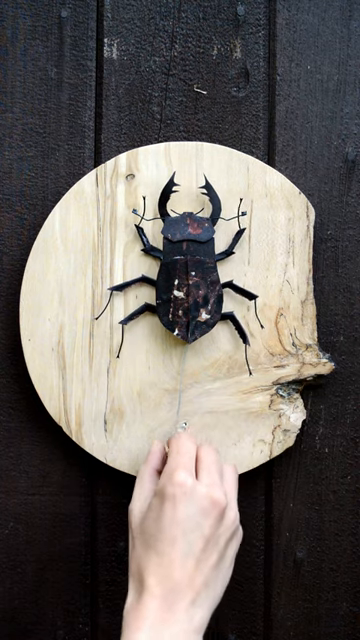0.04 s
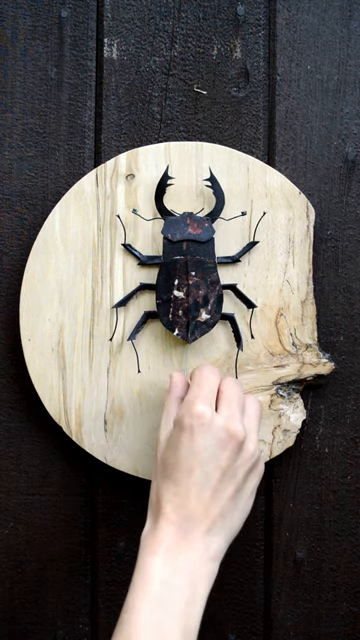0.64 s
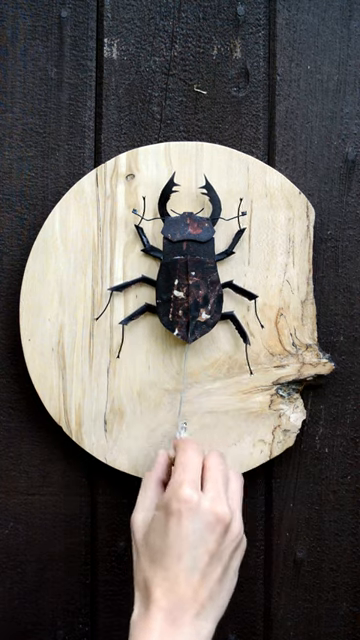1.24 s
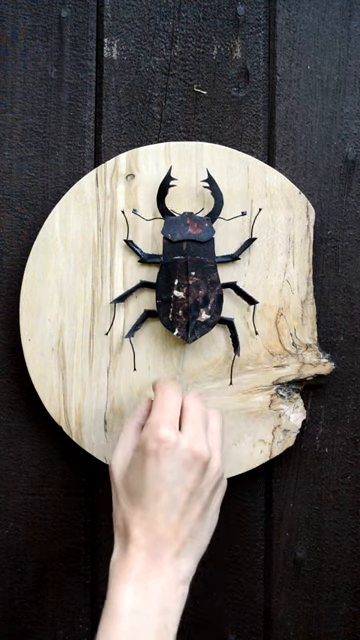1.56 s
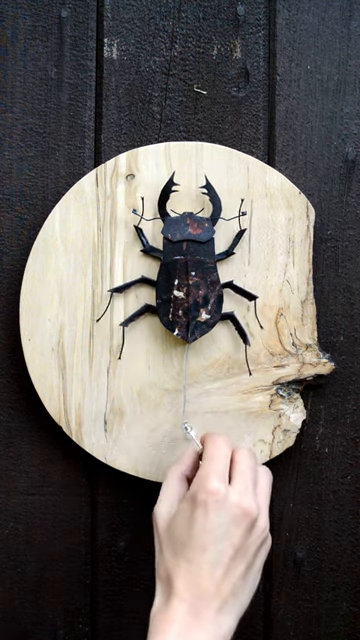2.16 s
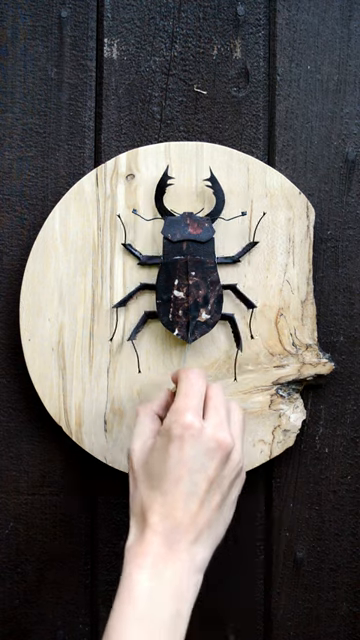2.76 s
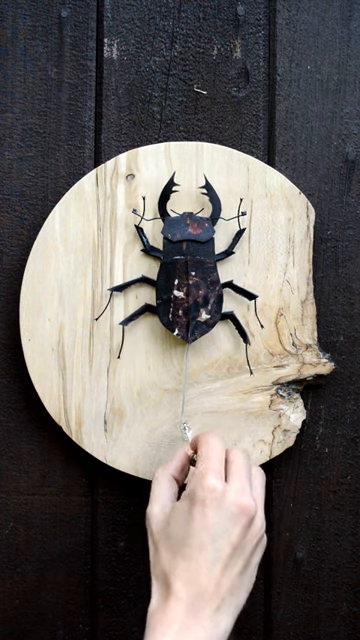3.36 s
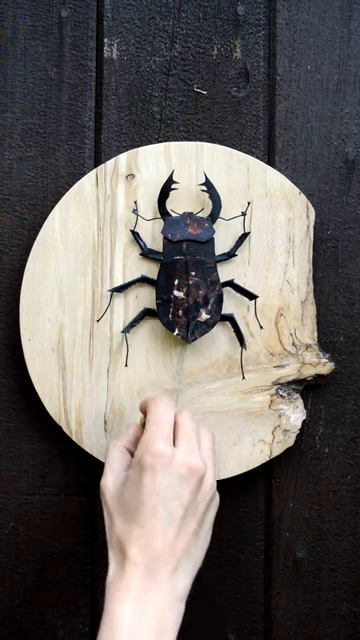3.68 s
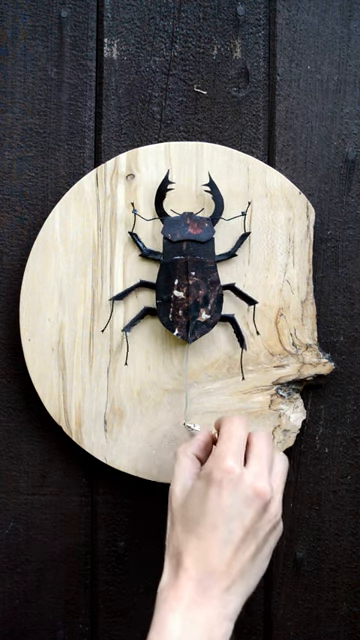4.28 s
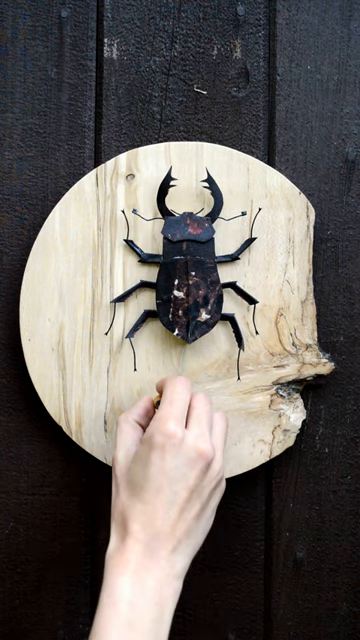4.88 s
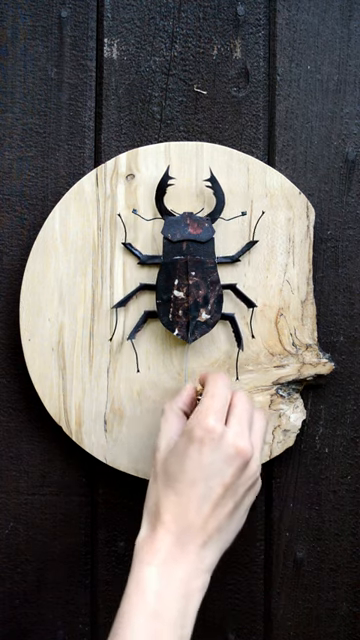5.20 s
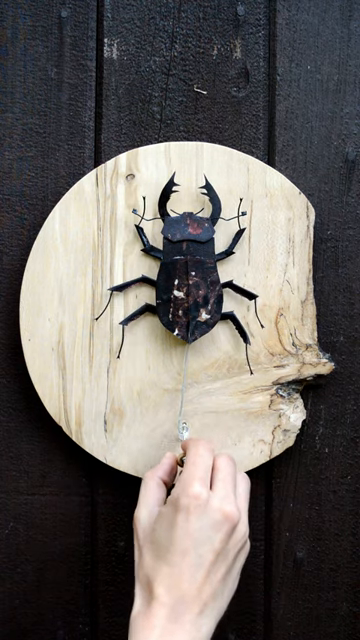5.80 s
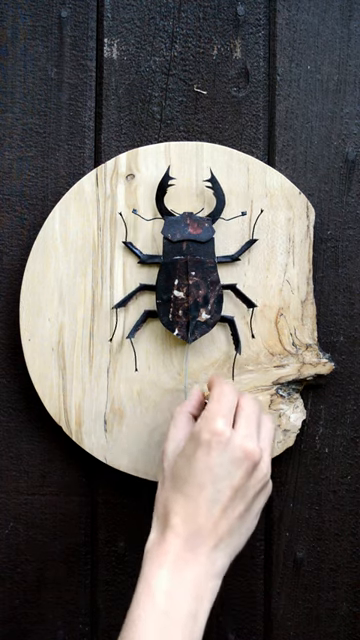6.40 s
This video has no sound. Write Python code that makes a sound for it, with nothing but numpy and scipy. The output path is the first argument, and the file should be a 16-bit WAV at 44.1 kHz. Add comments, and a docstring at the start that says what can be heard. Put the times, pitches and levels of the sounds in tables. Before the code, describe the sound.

Over a soft hiss of still air and the low drone of a distant propeller plane, a little hand-cranked toy clacks steadily right by the microphone. Dry knocks of wire and wood alternate with tiny leg scrapes, ticks and brief squeaks. Faint, high bird whistles come and go. About halfway, one bird warbles closer, then the pivot gives its two loudest squeaks. The plane's drone grows fuller as the toy keeps going.

```python
"""Close to one microphone, a hand cranks a small beetle automaton on a wooden slab, a little under one
turn a second. From the start, over a soft hiss, the wire linkage falls through its slack twice a turn and
clacks, then the legs slide and tick; a pivot squeaks now and then. Far off, small birds call thinly and
a propeller aircraft drones past with sinking pitch, its overtones growing from about two seconds in.
Midway a nearer bird warbles, the two loudest squeaks follow, and the toy clacks on to the end."""
import sys
import numpy as np
from scipy import signal
from scipy.fft import rfft, irfft
from scipy.io import wavfile
from scipy.ndimage import uniform_filter1d

SR = 44100
rng = np.random.default_rng(int(sys.argv[2]) if len(sys.argv) > 2 else 0)


def pcm_store(signal):
    """Save signal as 16-bit PCM."""
    levels = np.round(np.clip(np.atleast_2d(signal), -1, 1) * 32767)
    wavfile.write(sys.argv[1], SR, levels.astype(np.int16).T)


N = 284004

# legs sliding in their guides after a clack: middle_s, half_length_s, level_db
LEG_SLIDES = [(0.378, .028, -51), (0.835, .035, -52), (1.484, .042, -49.5), (1.985, .045, -54.5),
              (2.6, .045, -49.5), (3.06, .06, -56), (3.725, .026, -47), (4.27, .045, -56), (4.8, .022, -49),
              (5.47, .07, -58.5), (6.125, .034, -48)]


def undb(db):
    """Decibels to gain."""
    return 10 ** (np.asarray(db) / 20)


def unit(x):
    """Scale to rms 1."""
    return x / np.sqrt(np.mean(x ** 2))


def curves(rows):
    """Each column after the time column as a value for every sample."""
    times, *columns = np.transpose(rows)
    return [np.interp(np.arange(N) / SR, times, column) for column in columns]


def add(out, start_s, x):
    """Mix x into out from start_s."""
    i = max(int(start_s * SR), 0)
    out[i:i + len(x)] += x[:max(N - i, 0)]


def walk(rate_hz, size=N):
    """Smooth random drift with spread near 1."""
    hold = max(int(SR / rate_hz), 2)
    steps = np.repeat(rng.standard_normal(size // hold + 1), hold)
    return 1.312 * uniform_filter1d(uniform_filter1d(steps, hold), hold)[:size]


def colour(x, spectrum):
    """Filter x along its last axis by a spectrum of (frequency_hz, gain_db) points."""
    hz, db = np.transpose(spectrum)
    f = np.maximum(np.arange(x.shape[-1] // 2 + 1) * SR / x.shape[-1], 1)
    return irfft(rfft(x) * undb(np.interp(np.log(f), np.log(hz), db)), x.shape[-1])


def noise(spectrum):
    """Noise of rms 1 with the given colour."""
    return unit(colour(rng.standard_normal(N), spectrum))


def band(x, low_hz, high_hz, order=4):
    """Band-pass along the last axis."""
    f = np.maximum(np.arange(x.shape[-1] // 2 + 1) * SR / x.shape[-1], 1)
    return irfft(rfft(x) / (1 + (low_hz / f) ** (2 * order)) / (1 + (f / high_hz) ** (2 * order)))


def fade(t, t60):
    """Exponential decay, 60 dB down after t60 seconds."""
    return np.exp(-np.log(1000) * t / t60)


def air(level_db=-50, swell_db=0.14):
    """Still air all around the microphone: a low rumble and a smooth hiss."""
    # colour of the air: frequency_hz, relative_density_db
    air_spectrum = [(20, -11.5), (60, 0), (120, 0.5), (300, -17), (600, -12), (820, -8.5), (1100, -16),
                    (1500, -17), (2250, -21.5), (2400, -15), (2650, -23.5), (5000, -27), (9000, -29.5),
                    (15500, -33)]
    return undb(level_db + swell_db * walk(4.28)) * noise(air_spectrum)


def birds(far_db=-56, near_db=-44, waver=.025, warble_hz=16, echo_db=-3, echo_t60=0.15, distance_db=-2):
    """Distant whistles swell, slide or warble, blurred by many paths and followed by a short echo."""
    # whistles: start_s, length_s, first_hz, last_hz, relative_level_db, warble_share_of_pitch
    whistles = [(0.347, 0.17, 6840, 6350, -60, 0), (1.048, .13, 7050, 6700, -60, 0),
                (2.097, .42, 7240, 6540, -63.5, 0), (3.04, .2, 6100, 3300, -57, 0),
                (3.062, .08, 10900, 9600, -57, 0), (3.34, .15, 6700, 6700, -50, .035),
                (3.335, .15, 7940, 8170, -47.5, .035), (5.05, .16, 7930, 7830, -64, 0.00093)]
    out = np.zeros(N)
    for start_s, length_s, first_hz, last_hz, db, warble in whistles:
        t = np.arange(int(length_s * SR)) / SR
        swell = np.sqrt(np.sin(np.pi * t / length_s))
        direct = np.clip((db - far_db) / (near_db - far_db), 0, .9)  # nearer birds come through cleaner
        scatter = (walk(770) + 1j * walk(700))[:len(t)]
        blur = np.sqrt(2 * direct) + np.sqrt(1 - direct) * scatter
        hz = np.interp(t, [0, length_s], [first_hz, last_hz])
        hz *= 1 + warble * np.cos(2 * np.pi * warble_hz * t)
        hz *= 1 + waver * (1 - direct) * walk(300)[:len(t)]
        whistle = np.real(blur * np.exp(2j * np.pi * np.cumsum(hz) / SR)) / np.sqrt(2)
        add(out, start_s, swell * undb(db) * whistle)
    reflections = rng.standard_normal(SR // 2) * fade(np.arange(SR // 2) / SR, echo_t60)
    echo = signal.fftconvolve(out, reflections / np.linalg.norm(reflections))[:N]
    return undb(distance_db) * (out + undb(echo_db) * echo)


def aircraft(blade_hz=132.7, sink_hz_per_s=2.25, waver=0.002, flutter_db=0.35):
    """Far off, blade harmonics sink and fade in and out along the air path, over a turbulent rumble."""
    # the two strong blade harmonics: time_s, first_db, second_db
    strong_harmonics = [(0.02, -40, -49), (0.37, -39, -49), (0.46, -41, -60), (0.55, -40, -53),
                        (0.71, -41, -57), (0.93, -37, -49), (1.39, -36, -56), (1.94, -30, -44),
                        (2.03, -31, -50), (2.12, -30, -46), (2.7, -37, -36), (3.47, -41, -37),
                        (3.59, -40, -40), (4.32, -36, -32), (4.85, -37, -35), (4.98, -35, -33),
                        (5.88, -36, -39), (6.4, -36, -36)]
    # the third harmonic emerges as the aircraft nears: time_s, level_db
    third_harmonic = [(0, -62), (1.5, -63), (1.8, -55), (1.86, -49), (2.03, -54), (2.27, -46), (2.72, -54),
                      (3.11, -46), (3.86, -46), (4.35, -41), (4.61, -44), (4.66, -51), (6.37, -46),
                      (6.4, -42)]
    # swell of the rumble: time_s, level_db
    rumble_levels = [(0, -46.5), (1.5, -45), (2.7, -40.8), (3.8, -44), (4.4, -40), (4.9, -45), (5.7, -44),
                     (6.4, -41.5)]
    # colour of the rumble: frequency_hz, relative_density_db
    rumble_spectrum = [(30, -21), (60, -9), (100, -3), (150, -2), (200, 3), (280, -12), (345, -5),
                       (420, -9.5), (470, -22), (530, -11), (680, -29.5), (1200, -48)]
    first_db, second_db = curves(strong_harmonics)
    third_db, = curves(third_harmonic)
    rumble_db, = curves(rumble_levels)
    hz = blade_hz - sink_hz_per_s * np.arange(N) / SR
    phase = 2 * np.pi * np.cumsum(hz * (1 + waver * walk(14))) / SR
    blades = np.zeros(N)
    for k, db in enumerate([first_db + 0.2, second_db + 0.2, third_db - 0.2, third_db - 18], 1):
        gain = undb(db + flutter_db * k * walk(16))
        blades += gain * np.sin(k * phase + 2 * np.pi * rng.random())
    rumble = undb(rumble_db + walk(8)) * noise(rumble_spectrum)
    return np.sqrt(2) * blades + rumble


def pivot_squeaks(waver=0.011):
    """Close by, a dry pivot sings for a few hundredths of a second."""
    # squeaks: start_s, length_s, first_hz, last_hz, level_db
    squeaks = [(0.246, 0.0086, 4240, 4300, -52), (0.729, 0.019, 9170, 8800, -42),
               (0.746, .02, 9000, 8950, -56), (2.623, 0.016, 2830, 2800, -50.5),
               (3.581, 0.045, 894, 823.4, -39.5), (3.757, 0.013, 2800, 2780, -51.5),
               (4.096, 0.014, 4280, 4360, -35.5), (4.82, 0.018, 2800, 2770, -57),
               (6.121, 0.025, 2800, 2740, -53), (6.415, 0.013, 4400, 4320, -40)]
    out = np.zeros(N)
    for start_s, length_s, first_hz, last_hz, db in squeaks:
        progress = np.linspace(0, 1, int(length_s * SR))
        hz = np.interp(progress, [0, 1], [first_hz, last_hz]) * (1 + waver * walk(400)[:len(progress)])
        swell = np.sqrt(2 * np.abs(np.sin(np.pi * progress ** 0.92)))
        add(out, start_s, undb(db) * swell * np.sin(2 * np.pi * np.cumsum(hz) / SR))
    return out


def leg_scrapes(slips_per_s=170, spread_db=4, slip_t60=0.061, shaft_db=-62):
    """Stick and slip: tiny scrapes swell as the legs bear on their guides; the shaft always rubs a bit."""
    # the wooden slab under a sliding leg: frequency_hz, relative_density_db
    slab_spectrum = [(600, -28), (820, -10), (970, 0.5), (1070, -10.5), (1170, -1), (1430, -20),
                     (1850, -14.5), (1990, -14), (2120, -23), (4100, -22.5), (5500, -29), (9000, -26),
                     (12000, -46)]
    t = np.arange(N) / SR
    pressure = sum(undb(db) * np.exp(-np.minimum(((t - middle_s) / half_s) ** 2 / 2, 20))
                   for middle_s, half_s, db in LEG_SLIDES)
    slips = rng.random(N) < slips_per_s / SR
    strength = undb(spread_db * np.minimum(rng.exponential(size=N), 2))
    scrapes = unit(signal.fftconvolve(slips * strength, fade(t[:SR // 20], slip_t60))[:N])
    rub = unit(colour(scrapes * rng.standard_normal(N), slab_spectrum))
    return (pressure + undb(shaft_db)) * rub


def contacts(seat_s=.0027, seat_db=-5, strays_per_slide=2, stray_spread_s=.06):
    """Rows of time_s and peak_db in five bands: the wire touches, lands, seats, rebounds; legs tick."""
    # legs catching in their guides: time_s, knock_db, snap_db
    ticks = [(0.305, -59, -59), (0.361, -49.5, -59), (0.381, -47, -52), (0.847, -46.5, -55),
             (1.446, -53, -53), (1.468, -54, -58), (1.512, -51, -55.5), (1.926, -51, -64),
             (2.234, -48.5, -72), (2.52, -54, -65), (2.565, -57, -55), (2.606, -55, -54), (3.051, -53, -60),
             (3.558, -46, -62), (3.666, -59, -53), (3.757, -56, -55), (4.316, -61, -53.5),
             (4.364, -48, -58), (4.405, -52.5, -65), (4.669, -57, -63), (4.804, -46, -60),
             (4.822, -57, -54), (5.49, -63, -57), (5.646, -42, -62), (6.086, -53, -57), (6.114, -47, -63),
             (6.124, -54, -55)]
    # balance of a tick: offset_db per band
    tick_balance = (0, -2, -3, 2, -7)
    # one clack each half turn, a zero lead or rebound meaning none:
    # time_s, touch_lead_s, touch_db, rebound_delay_s, peak_db per band
    clacks = [(0.1395, .032, -39.5, .025, -37, -49, -49, -44, -48),
              (0.7325, .018, -40, 0, -33.5, -39, -37.5, -43.5, -42),
              (1.335, 0, 0, .019, -28, -38, -44.5, -41.5, -42.5),
              (1.8483, .0145, -38, 0, -34.5, -35.5, -38.5, -37, -44),
              (2.432, 0, 0, .029, -35.5, -38.5, -46, -44.5, -40),
              (2.9155, .02, -43, .013, -37, -41, -42.5, -38, -49),
              (3.582, .02, -44, 0, -45, -41, -49, -38, -43),
              (4.101, .012, -42, 0, -29.5, -45, -37, -40, -46),
              (4.582, .018, -44.5, .019, -42, -44.5, -50, -48, -41.5),
              (5.256, .019, -40, 0, -33, -39.5, -43, -43, -48),
              (5.929, 0, 0, .01, -39, -37.5, -49, -43.5, -41),
              (6.421, .0135, -42.5, 0, -35, -39, -39, -41, -49)]
    # balance of the light touch before the wire lands: offset_db per band
    touch_balance = (-.5, -3, -5.5, -8.5, -16)
    # the wire's rebound: peak_db per band
    rebound_peaks = (-46, -56, -56, -48, -53)
    # a stray tick around the middle of a slide: peak_db per band
    stray_peaks = (-60, -63, -60, -62, -67)
    rows = []
    for time_s, knock_db, snap_db in ticks:
        tick_db = [knock_db, knock_db, (knock_db + snap_db) / 2, snap_db, snap_db]
        rows.append((time_s, *np.add(tick_db, tick_balance)))
    for time_s, lead_s, touch_db, rebound_s, *landing_db in clacks:
        rows.append((time_s, *landing_db))
        rows.append((time_s + seat_s, *np.add(landing_db, seat_db)))
        if lead_s:
            rows.append((time_s - lead_s, *np.add(touch_balance, touch_db)))
        if rebound_s:
            rows.append((time_s + rebound_s, *rebound_peaks))
    for middle_s, *_ in LEG_SLIDES:
        for offset_s in stray_spread_s * rng.standard_normal(strays_per_slide):
            rows.append((middle_s + offset_s, *stray_peaks))
    return rows


def toy_ring(t, count, scatter_db=4, crack_db=11, crack_t60=0.011, tail_db=3, tail_t60=0.12):
    """The toy's ring, a row per contact: modes weighted by where it lands, a dry crack, a duller tail."""
    # resonances of the toy: pitch_hz, relative_level_db, t60_s
    resonances = [(865, -3, 0.075), (968, 6.5, 0.039), (1179, 0, 0.037), (1456, -4, 0.019),
                  (1682, -5, 0.024), (1988, -6, 0.051), (2344, 1, 0.037), (3010, -3.5, 0.04),
                  (3370, -10.5, 0.072), (3900, -6, 0.064), (4280, 4.5, 0.022), (4690, 0.5, 0.019),
                  (6670, 2.5, 0.021), (8660, -2, 0.019), (8940, -3, 0.051), (9820, -7.5, 0.034),
                  (10300, -5.5, 0.02), (10870, -3, 0.009), (12050, 1.5, 0.014)]
    hz, db, t60 = np.transpose(resonances)[:, :, None]
    modes = undb(db) * fade(t, t60) * np.sin(2 * np.pi * hz * t)
    strength, polarity = rng.standard_normal((count, len(resonances), 2)).transpose(2, 0, 1)
    weights = np.sign(polarity) * undb(scatter_db * strength)
    grain = rng.standard_normal((count, len(t)))
    crack = undb(crack_db) * fade(t, crack_t60) * grain
    tail = undb(tail_db) * fade(t, tail_t60) * band(grain, 500, 7000, order=1)  # wood soaks up treble
    return weights @ modes + crack + tail


def clacks_and_ticks(chatter_s=0.00072, peak_window=128, blow_samples=4096):
    """Close by, each contact chatters briefly and rings the toy with its own mix of knock and snap."""
    # what the toy radiates when touched: frequency_hz, relative_gain_db
    radiation = [(300, -34), (650, -17), (880, 7), (1250, 8), (2100, 8.5), (2700, -2), (4400, -1.5),
                 (5500, -8), (7200, -1.5), (9000, 2.5), (12300, 0.5), (14000, -3), (16000, -12)]
    # limits of the five bands, from wooden knock to wire snap: edge_hz
    band_edges = [700, 1400, 3200, 6500, 10500, 16000]
    t = np.arange(blow_samples) / SR
    times, *peaks_db = np.transpose(contacts())
    # the wire skids before it seats
    force = rng.standard_normal((len(times), blow_samples)) ** 3 * t * np.exp(-t / chatter_s)
    ringing = signal.fftconvolve(force, toy_ring(t, len(times)), axes=1)
    padded = np.pad(ringing, [(0, 0), (peak_window, 0)])[:, :blow_samples]
    blows = colour(padded, radiation)
    balanced = np.zeros_like(blows)
    for low_hz, high_hz, db in zip(band_edges, band_edges[1:], peaks_db):
        part = band(blows, low_hz, high_hz)
        peak_rms = np.sqrt(uniform_filter1d(part ** 2, peak_window).max(axis=1))
        balanced += part * (undb(db) / peak_rms)[:, None]
    out = np.zeros(N)
    for time_s, blow in zip(times, balanced):
        add(out, time_s - peak_window / SR, blow)
    return out


def scene():
    """One microphone: the toy close by, everything else far away."""
    toy = clacks_and_ticks() + leg_scrapes() + pivot_squeaks()
    return (toy + aircraft() + birds() + air())[None]


def record(dry, top_hz=15750):
    """The recorder cuts the top treble steeply."""
    return signal.sosfilt(signal.ellip(10, .2, 70, top_hz, fs=SR, output="sos"), dry)


dry = scene()
out = record(dry)
pcm_store(out)
```